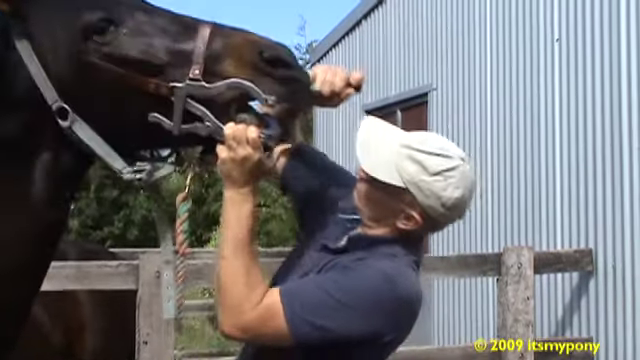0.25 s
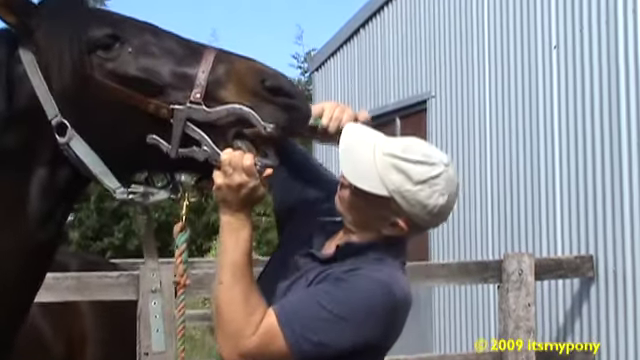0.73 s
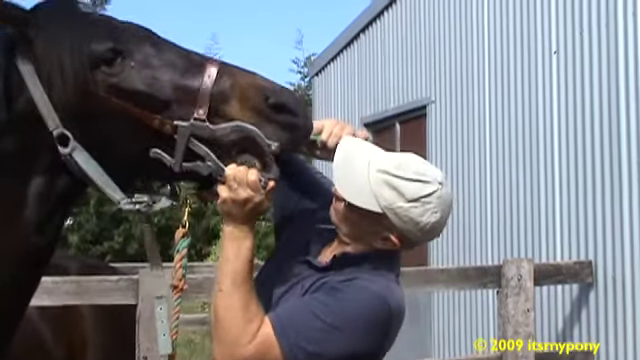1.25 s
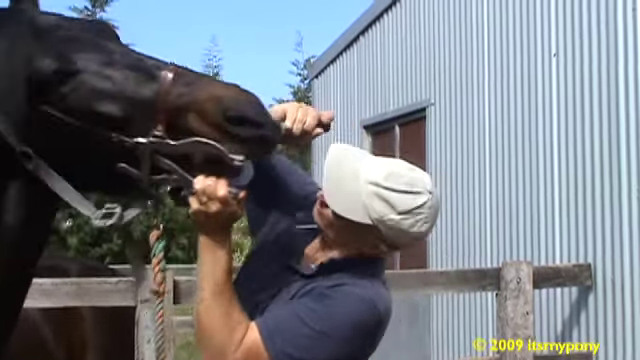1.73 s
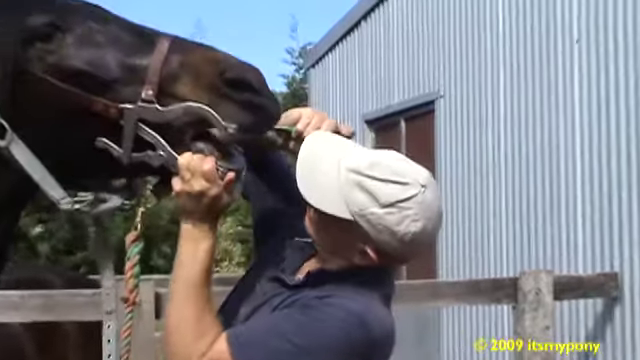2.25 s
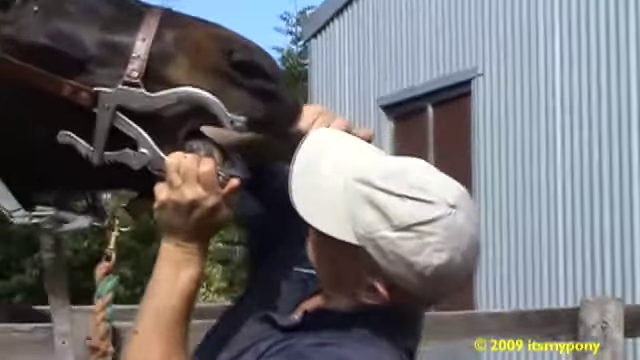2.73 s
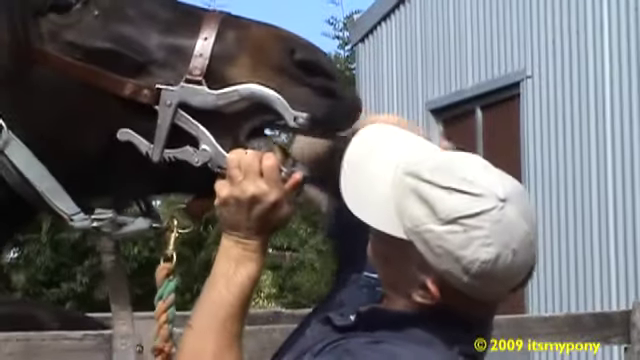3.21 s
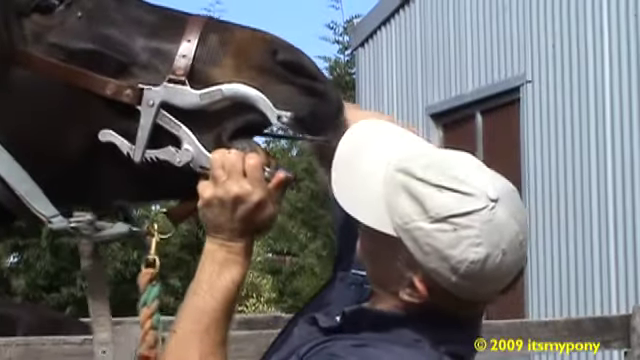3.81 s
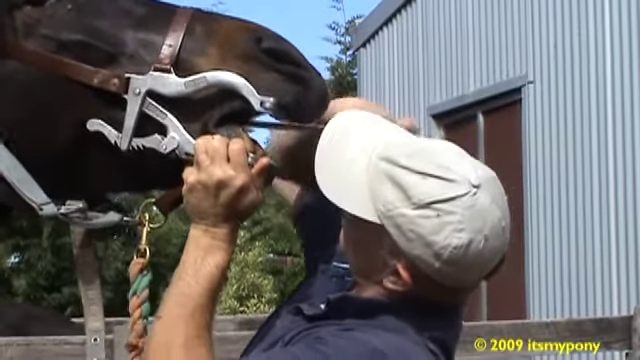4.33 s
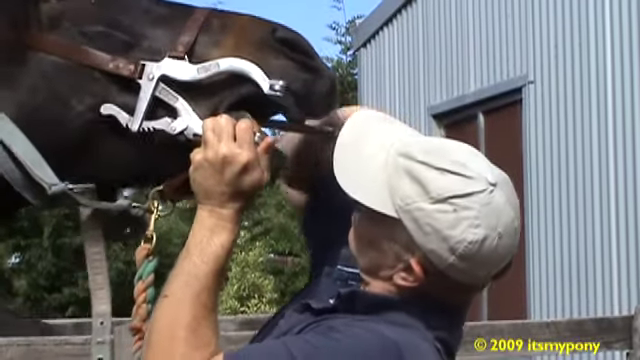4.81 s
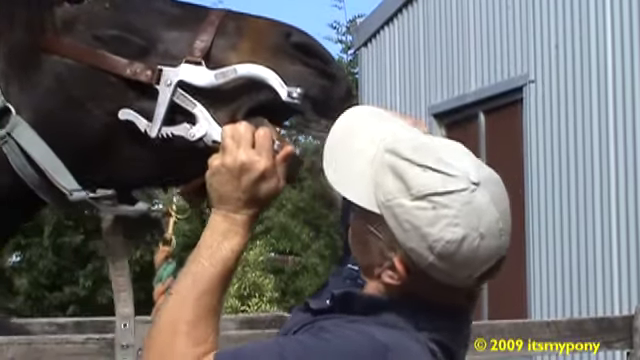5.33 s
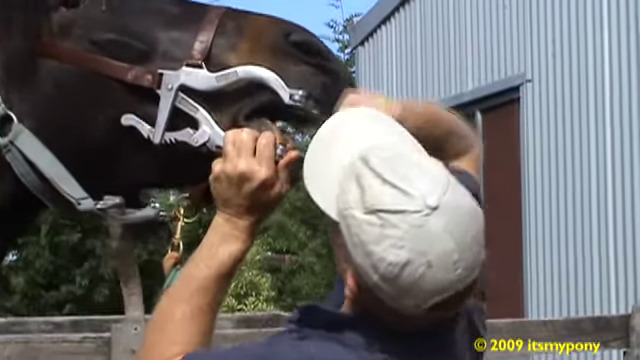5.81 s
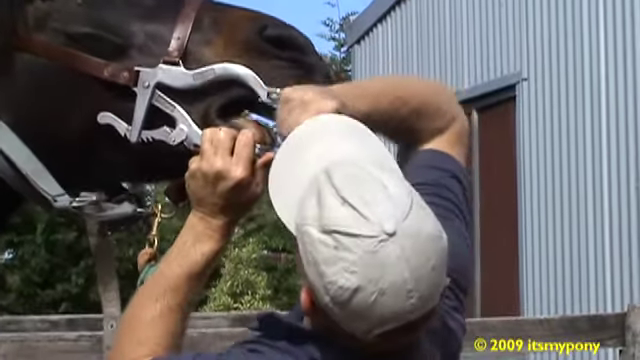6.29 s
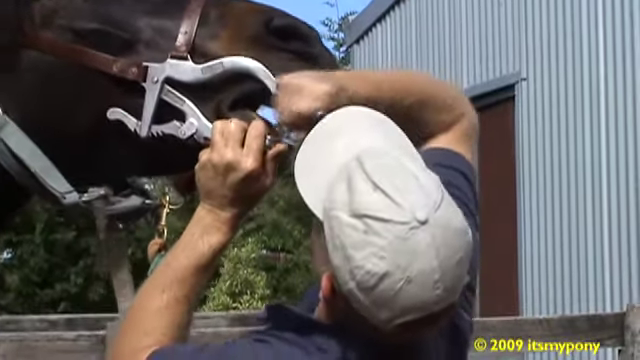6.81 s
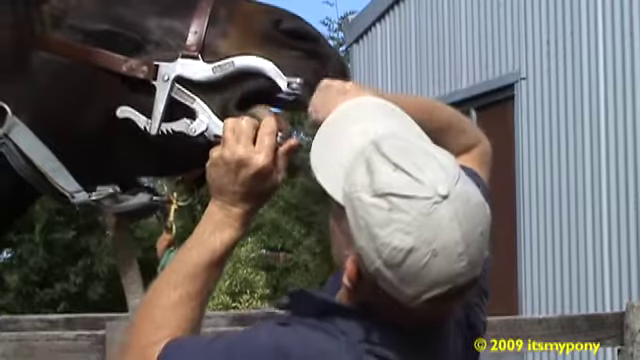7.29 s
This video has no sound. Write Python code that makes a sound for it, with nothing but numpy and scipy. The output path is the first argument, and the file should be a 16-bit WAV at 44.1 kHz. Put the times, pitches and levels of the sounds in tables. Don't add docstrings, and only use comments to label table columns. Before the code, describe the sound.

Gritty metal filing on large animal teeth, faint at first then hard and fast, with hollow shaft hum, sharp clacks, dull ticks and distant chirps outdoors.

```python
import sys
import numpy as np
from scipy import signal
from scipy.io import wavfile
from scipy.ndimage import uniform_filter1d

SR = 44100
rng = np.random.default_rng(int(sys.argv[2]) if len(sys.argv) > 2 else 0)


def convert_level_to_amplitude(level_db):
    exponent = np.asarray(level_db, float) / 20
    return 10 ** exponent


def inscribe(sig):
    pcm = np.round(np.clip(np.atleast_2d(sig).T, -1, 1) * 32767)
    wavfile.write(sys.argv[1], SR, pcm.astype(np.int16))


N = 332955
T = np.arange(N) / SR

# [Hz, dB]
WASH = [(26, -40.5), (45, 3.5), (92, 4), (287, -3.5), (392, 3.5), (479, -6), (1250, -7.5), (8500, -20.5)]
WASH_DB = -51.5
# [s, Hz, dB]
ENGINES = [
    [(0.0, 92.2, -57), (1.282, 78.4, -56.5), (1.5, 83.9, -72)],
    [(1.75, 67, -53), (2.312, 111, -54.5), (2.55, 106.7, -66)],
    [(3.25, 106, -53), (4.37, 113.2, -47), (5.9, 131.4, -54)],
    [(7.12, 138, -76), (7.234, 139.4, -44.5), (7.55, 134, -44.5)],
]
# [s, Hz, dB]
SONG = [
    (0, 5600, -16),
    (.011, 3800, -6),
    (.024, 3300, -4),
    (.029, 4900, -28),
    (.037, 3080, -7),
    (.058, 3250, -1),
    (.066, 3700, -22),
    (.077, 3000, -5),
    (.088, 3600, -18),
]
# [s, dB]
SONGS = [
    (0.170, -45),
    (0.852, -47),
    (1.844, -42.5),
    (2.456, -40.5),
    (5.693, -35),
    (6.324, -38),
    (7.003, -36),
]
# [s, Hz, dB]
PEEP = [
    (0, 3800, -60),
    (.035, 4700, -65),
]
PEEPS = [
    .7,
    .81,
]
# [s, Hz, dB]
TRILL = [
    (2.01, 4800, -64),
    (2.14, 4780, -66),
]

# [Hz, Hz, dB]
JAW = [
    (572, 68, 5.5),
    (752.4, 10, -6.5),
    (940, 35, -1.5),
    (1283, 9, -9.5),
    (960, 1120, 6.5),
]
BLADE = [
    (2030, 210, -5.5),
    (2430, 680, 11),
    (2860, 60, 1),
    (3260, 150, -1),
    (3556, 120, 3.5),
    (4160, 180, -2),
    (2720, 820, 2),
]
SIZZLE = [
    (4830, 960, -5.5),
    (5750, 910, 9.5),
    (6670, 800, 0.5),
    (7320, 300, 3.5),
    (8500, 900, -14.5),
    (6000, 1400, 2),
]
VALLEYS_HZ = [1730, 2580, 4615, 6130]

# [s, dB, Hz]
THUMPS = [(0.819, -44, 289), (2.079, -32, 190), (2.693, -35, 161), (3.158, -34, 235.5), (5.775, -29, 258),
          (6.002, -30.5, 112), (6.243, -30, 178.1), (6.429, -35, 180.1), (6.607, -30, 184.8),
          (6.965, -30.5, 183), (7.145, -34, 200.2), (7.321, -37, 187.2)]
# [s, dB, Hz]
SNAGS = [(0.079, -23, 953), (0.388, -24.5, 780), (0.413, -29.5, 950), (0.494, -32, 993),
         (0.591, -32.5, 929), (0.877, -34, 2030), (1.003, -29, 930), (1.451, -28, 2330), (1.533, -26, 770),
         (1.609, -22, 748), (1.635, -18.5, 931), (1.801, -18, 709.4), (1.933, -22, 1110), (2.299, -20, 940),
         (2.386, -30, 965), (2.49, -24, 904), (2.891, -11.5, 775), (3.068, -15.5, 1090),
         (3.162, -19, 743.4), (3.225, -17, 755.7), (3.308, -17, 780), (3.355, -26, 937), (3.511, -16, 978),
         (3.579, -17.5, 3640), (3.683, -22, 1310), (3.704, -13.5, 1140), (4.119, -18, 1290),
         (4.363, -24, 764), (4.533, -21.5, 3500), (4.58, -13.5, 956), (4.844, -15, 2849),
         (4.859, -15.5, 2842), (4.976, -13, 950.6), (5.052, -17, 980), (5.173, -11, 980),
         (5.195, -22, 933.5), (5.473, -17.5, 942), (3.672, -27, 1400), (5.977, -18, 1110),
         (6.216, -20, 740), (6.534, -17.5, 950), (6.587, -18.5, 751), (7.501, -24, 900),
         (6.774, -16.5, 776), (6.964, -25.5, 703)]
# [s, dB, ms, Hz]
CHATTERS = [(1.46, -38, 21.35, 2230), (3.588, -37, 19, 2900), (1.82, -36, 15, 2400), (2.32, -54, 24, 4520),
            (2.612, -32, 29.5, 2380), (2.615, -44, 34.5, 6510), (2.797, -37, 45, 2360),
            (3.216, -31.5, 35.4, 2325), (5.937, -29, 11, 2430), (2.523, -40, 6.4, 4400),
            (3.377, -44.5, 20, 4280), (3.41, -34, 15, 3600), (3.605, -39, 32, 7760),
            (3.606, -33.5, 62, 3680), (3.618, -40, 30, 4280), (2.54, -39, 8, 4400),
            (4.004, -33.5, 14.3, 5455), (4.048, -32.5, 33, 5560), (4.059, -31, 14, 7220),
            (4.128, -36, 38, 3627), (4.248, -36, 20, 4970), (4.251, -37, 31, 7320), (4.459, -32, 32, 2890),
            (4.684, -26.5, 29.7, 5795), (4.676, -34, 7, 5570), (4.865, -31, 24.7, 2870),
            (5.006, -32, 9, 2900), (5.087, -44, 29.4, 7140), (5.299, -44, 30, 7340), (5.364, -34, 25, 2860),
            (5.37, -36, 15.7, 3560), (7.336, -32, 28, 3440), (5.491, -36.5, 39, 3530),
            (5.501, -39.5, 28.7, 7320), (5.506, -42, 20, 8280), (5.58, -44, 22, 7300),
            (3.815, -36.5, 50, 3660), (5.683, -37, 30, 8151), (5.695, -31.5, 22, 3596),
            (6.612, -51, 11.8, 7280), (6.791, -36, 16, 2870), (6.791, -33.5, 19.5, 3640),
            (1.467, -47, 24, 2300),
    (6.67, -41, 13, 1364),
    (1.552, -40.5, 21, 1600),
    (6, -32.5, 20, 3000),
    (7.237, -27, 10.6, 1490),
]
# [s, dB, ms, Hz]
DRONES = [(0.094, -42, 22, 956), (0.363, -51, 18, 930), (0.414, -47, 26, 943), (7.16, -42, 11, 740),
          (1.368, -53, 63, 1270), (1.692, -54, 70, 1260), (2.405, -41, 27, 937.4), (2.621, -40, 15, 1250),
          (2.804, -38.5, 28, 1240), (3.0, -41, 22, 984), (3.2, -35.5, 32.1, 1480), (3.833, -47, 34, 1569),
          (4.041, -40, 57, 960), (4.145, -28.5, 57, 1341), (4.239, -34.5, 39, 950), (4.581, -29, 28, 942),
          (4.65, -34.5, 24, 1360), (4.686, -40, 30.2, 1340), (4.879, -32, 60, 972), (4.976, -29, 39.6, 964),
          (5.064, -33, 48, 1375), (5.065, -37, 34, 960), (5.19, -30, 34, 957), (5.281, -32, 17, 1340),
          (5.29, -34, 55, 950), (5.59, -31.5, 57, 1003), (5.681, -38, 52, 993), (6.186, -41.5, 20, 1370),
          (6.241, -37, 30, 1530), (6.541, -33, 17.3, 610), (6.626, -37, 35.4, 1425),
          (6.818, -45.5, 141, 1275), (6.492, -31.5, 26, 1340)]
CHATTER_WIDTH_HZ, DRONE_WIDTH_HZ = 72, 52
SNAG_DB, SNAG_S, SNAG_KICK_DB = -5.5, 0.022, -6.5

# [s, dB, dB, Hz]
KNOCKS = [(0.2576, -25.5, -32, 4520), (0.9613, -32.5, -4.5, 5960), (1.27, -43.5, -14, 2250),
          (2.2495, -23.5, -12.5, 2780), (2.4397, -22.5, -15, 4220), (2.8603, -23.5, -7.5, 2890),
          (2.9406, -21, -12.5, 2818), (3.045, -19.5, -26, 2560), (3.13, -21.5, -35, 8150),
          (3.1423, -24, -17, 2710), (3.5101, -29.5, 1, 3570), (3.9824, -20, -25, 3000),
          (4.273, -17, -39, 3410), (4.3425, -17.5, -7.5, 3400), (4.4216, -16.5, -27, 2928),
          (4.4969, -13, -24, 3544), (4.7702, -13.5, -16, 2875), (5.771, -19, -1.5, 2417),
          (5.9313, -14, -7.5, 7020), (6.0988, -17.5, -5, 4134), (6.325, -20.5, -1, 6070),
          (6.478, -25.5, -5.5, 2820), (6.608, -28.5, -7, 2860), (6.7097, -16.5, -9.5, 2780),
          (6.8814, -13, -10, 3364), (7.1441, -23.5, -12.5, 3446), (7.2311, -21.5, -7.5, 2550),
          (7.324, -19, -8.5, 3300), (7.444, -16.5, -8.5, 2580), (7.5276, -17, -29, 3466)]
# [s, dB]
TOUCHES = [
    (4.686, -17),
    (5.0573, -28.5),
]
TOUCH_GAG_DB, TOUCH_HZ = -15, 2900
GAG_HZ = 1321
KICK_DB, KICK_HZ = -2, 372
KNOCK_SIZZLE_DB, HARD_DB, DULLING = -6.5, -12, 1
FLAT_HZ, FLAT_DB = 3480, -6

# [s, dB, ms, Hz]
STRUCK = [(0.09, -33.5, 22, 379.0), (0.413, -37, 49, 387.0), (0.597, -40, 20, 386.0),
          (0.97, -30.5, 21, 385), (1.05, -46, 25, 385), (1.613, -40, 20, 380), (2.228, -34.5, 21, 380),
          (1.46, -26.5, 34, 370.0), (1.815, -28.5, 25, 387.0), (2.134, -36, 18, 380.0),
          (2.314, -31.5, 48, 393.0), (3.233, -23.5, 11.4, 385.0), (3.377, -25, 32, 391.0),
          (3.787, -29, 76, 377.0), (4.012, -26, 36, 394.0), (4.22, -23.5, 39, 388.0),
          (4.507, -26.5, 15.4, 388.0), (4.891, -27, 14.4, 370.0), (5.061, -17.5, 29, 371.0),
          (5.666, -29, 41.6, 361.0), (5.784, -24, 42, 366.0), (5.962, -25.5, 66, 378.0),
          (6.105, -34, 25.9, 376.0), (6.344, -28.5, 58, 383.0), (6.487, -28, 33.1, 360.0),
          (6.895, -29.5, 65, 343.0), (6.974, -29.5, 26, 364.0), (7.15, -33, 24.8, 353.0),
          (7.241, -32, 27.3, 360.0), (7.459, -31.5, 120, 366.0)]
# [s, dB, ms, Hz]
SWUNG = [(1.014, -34, 34, 375), (1.551, -24, 38, 378.6), (1.639, -22.5, 30, 384.4), (2.745, -24, 62, 380.3),
         (3.33, -22, 35, 359.2), (3.627, -22, 40, 362.3), (3.729, -20.5, 55, 380.8),
         (4.344, -23, 9.95, 392.6), (4.41, -22.5, 65, 381.2), (4.788, -22.5, 65, 370),
         (5.088, -24.5, 16, 372), (5.186, -24, 27, 372), (5.406, -20, 64, 359.7), (6.253, -22.5, 35, 361.3),
         (6.555, -30.5, 37, 353.2), (6.627, -18.5, 26, 355), (6.71, -27.5, 30, 387.7),
         (6.792, -29.5, 58, 360.8), (7.343, -28.5, 46, 397.7), (7.566, -11, 50.4, 351)]
# [s, dB, ms, Hz]
GRIPPED = [(0.375, -39.5, 32, 378), (0.514, -34, 22, 396), (0.557, -43, 21, 400), (0.665, -45, 23, 390),
           (1.958, -26.5, 41, 372.0), (2.271, -34, 15, 371.4), (2.409, -26.5, 31, 389.6),
           (2.563, -23.5, 17, 382.6), (2.614, -29.5, 100, 381.0), (2.905, -19, 24, 385.4),
           (2.984, -25.5, 26, 399.4), (3.079, -34, 47, 359), (3.2, -20.5, 27, 381), (3.543, -22, 52, 365.2),
           (3.959, -21.5, 55, 376.5), (4.178, -21.5, 61, 375.7), (4.596, -23.5, 30.3, 379.7),
           (4.689, -27, 57, 372.7), (5.004, -19.5, 40, 360.2), (5.212, -15.5, 36, 372.0),
           (5.272, -27, 26.5, 402.4), (5.518, -24.5, 50.3, 353.7), (5.58, -21.5, 27, 399),
           (6.197, -28.5, 23, 353), (7.1, -33, 50, 376.8)]
# [s,
# dB, ms, Hz]
SWUNG_MORE = [
    (0.269, -46, 28, 395),
    (1.341, -49, 46, 345.2),
    (1.735, -46, 37, 367),
    (5.625, -27, 36, 365.4),
    (6.451, -28, 42.2, 385.5),
]
HUM_RISE = [0.17, 0.51, 0.7]
RING_ON_S, RING_ON_DB = 0.028, -14.5

# [s, dB, ms]
JABS = [(0.084, -45, 35), (0.235, -52, 27), (0.982, -62, 53.5), (1.458, -35, 34), (1.615, -37, 44),
        (1.808, -36, 32), (4.131, -31, 68), (4.366, -35.5, 41), (4.45, -31.5, 51), (5.359, -37.5, 87),
        (5.776, -41, 72), (5.978, -39.5, 57), (6.224, -39, 45.5), (6.485, -41, 30.5), (6.777, -36.5, 37.0),
        (7.251, -47, 44), (7.324, -37, 41)]
# [s, dB, ms]
SWEEPS = [(0.311, -47, 15), (0.396, -54.5, 44), (1.225, -51, 37), (1.547, -44.5, 45), (1.929, -46.5, 63),
          (2.097, -55, 50), (2.408, -37, 65), (3.071, -31, 45), (3.314, -40, 32), (3.391, -33, 55),
          (3.71, -35, 71.6), (3.813, -32, 64), (4.578, -27.5, 37), (4.776, -29, 46), (4.863, -26, 56),
          (5.489, -32.5, 61), (5.59, -34.5, 59.5), (5.683, -32.5, 39.3), (6.347, -37.5, 40),
          (6.425, -37, 50), (6.542, -42.5, 21), (6.608, -39, 80), (6.723, -32, 26.3), (6.899, -34.5, 24),
          (6.968, -35.5, 47), (7.074, -49.5, 84), (7.147, -40.5, 34), (7.464, -43.5, 48)]
# [s, dB, ms]
DRAGS = [(0.506, -51.5, 25), (2.307, -48, 97), (2.526, -36.5, 50), (2.613, -34.5, 71), (2.724, -39.5, 47),
         (2.808, -32, 41), (2.899, -33.5, 40), (3.0, -29.5, 46), (3.212, -31.5, 103), (3.524, -43, 65),
         (3.616, -32, 54), (3.936, -33.5, 50), (4.042, -30, 71), (4.259, -27.5, 63.5), (4.683, -26.5, 57),
         (4.996, -37.5, 69.6), (5.078, -29.5, 59.4), (5.206, -38.5, 106), (5.296, -29, 51),
         (5.947, -32, 9.25), (6.186, -43, 48.0), (7.569, -21, 38.6)]
STROKE_RISE = [0.22, 0.45, 0.65]
# [s, dB]
EDGE = [
    (0, -4),
    (.45, -12),
    (1.9, -11),
    (2.4, -12),
    (3.4, -5),
    (4.5, -12.5),
    (5.7, -4),
    (6.4, -10),
    (7.3, -3),
]
JAW_BY_GRIT_DB, JAW_BY_HUM_DB = 0.3, -9.5
JAW_MASS = 900
FIRM_DB, JAW_LAW, SIZZLE_LAW = -33.5, 0.69, 1.11


def evened(x):
    return x / np.sqrt(np.mean(x ** 2) + 1e-20)


def steadied(x):
    power = uniform_filter1d(uniform_filter1d(x ** 2, size=1500), size=1500)
    return x / np.sqrt(power + 1e-12)


def add(mix, s, sound):
    part = mix[round(s * SR):][:len(sound)]
    part += sound[:len(part)]


def drift(hz):
    knots = rng.standard_normal(3000)
    return 1.22 * np.interp(T * hz, np.arange(len(knots)), knots)


def ring(x, hz, width):
    r = np.exp(-np.pi * width / SR)
    return 2 * signal.lfilter([1 - r], [1, -r * np.exp(2j * np.pi * hz / SR)], x).real


def band(x, lo_hz, hi_hz):
    return signal.sosfilt(signal.butter(2, [lo_hz, hi_hz], "bandpass", fs=SR, output="sos"), x)


def whistle(rows, waver):
    s, hz, db = np.transpose(rows)
    t = np.arange(s[0], s[-1], 1 / SR)
    phase = 2 * np.pi * np.cumsum(np.interp(t, s, hz)) / SR
    tone = np.sin(phase) * signal.windows.tukey(len(t), .1)
    return s[0], np.sqrt(2) * convert_level_to_amplitude(np.interp(t, s, db) + waver[:len(t)]) * tone


def wash():
    frames, hz = N // 256 + 5, np.fft.rfftfreq(1024, 1 / SR)
    a, b, patches = rng.standard_normal((frames, 513, 3)).T
    patches = evened(uniform_filter1d(uniform_filter1d(patches, size=10, axis=0), size=14, axis=1))
    f, db = np.transpose(WASH)
    tilt_db = np.interp(np.log(hz + 1), np.log(f + 1), db)[:, None]
    z = (a + 1j * b) * convert_level_to_amplitude(tilt_db + 2.2 * patches)
    noise = signal.istft(z, nperseg=1024, noverlap=768)[1][:N]
    nearer_db = 3.8 * T / T[-1]
    return convert_level_to_amplitude(WASH_DB + nearer_db) * evened(noise)


def traffic():
    out = np.zeros(N)
    for rows in ENGINES:
        add(out, *whistle(rows, 1.5 * drift(12)))
    return out


def bird():
    out, phrase = np.zeros(N), whistle(SONG, 3.5 * drift(400))[1]
    for s, db in SONGS:
        add(out, s, convert_level_to_amplitude(db) * phrase)
    add(out, *whistle(TRILL, 4 * drift(150)))
    for s in PEEPS:
        add(out, s, whistle(PEEP, drift(250))[1])
    return out


def yard(x):
    t = T[:9000]
    hits = rng.choice([-1., 1.], len(t)) * (rng.random(len(t)) < 2000 / SR)
    taps = hits * (t > .006) * convert_level_to_amplitude(-60 * t / 0.21)
    return signal.oaconvolve(x, taps / np.linalg.norm(taps))[:N]


def thumps():
    out, t = np.zeros(N), T[:5000]
    for s, db, hz in THUMPS:
        cycles = np.sin(2 * np.pi * hz * t) + 0.55 * np.sin(3 * np.pi * hz * t)
        add(out, s, convert_level_to_amplitude(db + 3.5 - 60 * t / 0.11) * (1 - np.exp(-t / 0.0078)) * cycles)
    return out


def snags():
    out, t = np.zeros(N), T[:2500]
    jolt = convert_level_to_amplitude(SNAG_KICK_DB - 60 * t / 0.17) * np.sin(2 * np.pi * KICK_HZ * t)
    for (s, db, hz), crack in zip(SNAGS, rng.standard_normal((len(SNAGS), len(t)))):
        crack = crack * convert_level_to_amplitude(-60 * t / SNAG_S) * (1 - np.exp(-t / 0.0002))
        tick = band(band(crack, 520, 2500), 520, 2500) + 4.7 * ring(ring(crack, hz, 130), hz, 900)
        add(out, s, convert_level_to_amplitude(db + SNAG_DB) * (tick / abs(tick).max() + jolt))
    return out


def chatter(rows, width_hz):
    out, u = np.zeros(N), np.arange(-3000, 3000) / SR
    for (s, db, length, hz), grit in zip(rows, rng.standard_normal((len(rows), len(u)))):
        rung = ring(ring(grit * abs(grit), hz, width_hz), hz, 4 * width_hz)
        add(out, s + u[0], evened(rung) * convert_level_to_amplitude(db - 6.4 * (2300.0 * u / length) ** 2))
    return out


def knocks():
    out, t = np.zeros(N), T[:5000]
    blows = KNOCKS + [(s, db, TOUCH_GAG_DB, TOUCH_HZ) for s, db in TOUCHES]
    modes = (BLADE + SIZZLE)[:12]
    luck = rng.standard_normal((len(blows), 12 + len(t)))
    for (s, db, gag_db, hz), shares, crack in zip(blows, luck[:, :12], luck[:, 12:]):
        crack = crack * (convert_level_to_amplitude(-60 * t / 0.016) + 0.23 * convert_level_to_amplitude(-60 * t / 0.088)) * (1 - np.exp(-t / .0003))
        rung = [convert_level_to_amplitude(mode_db + 2.5 * share) * ring(crack, f, width) * np.sqrt(100 / width)
                for (f, width, mode_db), share in zip(modes, shares)]
        sizzle_db = KNOCK_SIZZLE_DB - DULLING * max(db - HARD_DB, 0)
        sizzle_db += FLAT_DB * (abs(hz / FLAT_HZ - 1) < .06)
        gag = ring(ring(crack, GAG_HZ, 49), GAG_HZ, 230) + 0.15 * band(crack, 640, 1200)
        kick = ring(ring(crack, KICK_HZ, 53), KICK_HZ, 270)
        blade = band(sum(rung[:len(BLADE)]), 1400, 4500)
        sizzle = band(sum(rung[len(BLADE):]), 4400, 9000)
        favoured = ring(ring(crack, hz, 150), hz, 900)
        parts = [(gag, gag_db), (kick, gag_db + KICK_DB), (blade, -6.1),
                 (sizzle, sizzle_db), (favoured, -10)]
        for part, part_db in parts:
            peak = np.sqrt(uniform_filter1d(part ** 2, size=130).max())
            add(out, s, convert_level_to_amplitude(db + part_db) * part / peak)
    return out


def swells(tables, rise_shares):
    power = np.zeros(N)
    u = np.arange(-SR // 4, SR // 4) / SR
    for rows, share in zip(tables, rise_shares):
        for s, db, length, *_ in rows:
            side = np.where(u < 0, share, 1 - share)
            part = convert_level_to_amplitude(db - 6 * (1e3 * abs(u) / length / side) ** 1.95) ** 2
            add(power, max(s - .25, 0), part[max(round((.25 - s) * SR), 0):])
    return np.sqrt(power)


def shaft():
    s, _, _, hz = np.transpose(sorted(STRUCK + SWUNG + SWUNG_MORE + GRIPPED))
    turns = np.cumsum(np.interp(T, s, hz) * (1 + 0.0348 * drift(133))) / SR
    tone = np.sqrt(2) * np.cos(2 * np.pi * turns) + 0.11 * np.cos(4 * np.pi * turns)
    bend = swells([STRUCK, SWUNG + SWUNG_MORE, GRIPPED], HUM_RISE)
    keep = np.exp(-1 / (RING_ON_S * SR))
    bend = np.hypot(bend, convert_level_to_amplitude(RING_ON_DB) * signal.lfilter([1 - keep], [1, -keep], bend))
    return bend * tone * convert_level_to_amplitude(3 * drift(90)), turns, bend


def catches(turns, per_s):
    size = convert_level_to_amplitude(3.1 * np.minimum(rng.exponential(1, N), 4))
    hits = (rng.random(N) < per_s / SR) * rng.choice([-1., 1.], N)
    return evened(hits * size * (1 + 0.49 * np.cos(2 * np.pi * turns)))


def body(drive, modes, wander_db):
    out = np.zeros(N)
    for hz, width, db in modes:
        turn = np.exp(2j * np.pi * np.cumsum(hz * (1 + 0.03 * drift(11))) / SR)
        r = np.exp(-np.pi * width / SR)
        shifted = drive * convert_level_to_amplitude(db + wander_db * drift(18)) * turn.conj()
        rung = signal.lfilter([1 - r], [1, -r], shifted)
        out += (turn * rung).real * np.sqrt(100 / width)
    return out


def hollowed(x):
    for hz in VALLEYS_HZ:
        x = x - .5 * ring(x, hz, 130)
    return x


def grind(turns, bend):
    coarse, clumps = catches(turns, 2000), convert_level_to_amplitude(2.7 * drift(90))
    fine = 0.52 * coarse + 0.92 * catches(turns, 3500)
    finest = 0.52 * coarse + 0.92 * catches(turns, 3500)
    cut = swells([JABS, SWEEPS, DRAGS], STROKE_RISE)
    firm = cut / convert_level_to_amplitude(FIRM_DB)
    by_grit = convert_level_to_amplitude(JAW_BY_GRIT_DB + FIRM_DB) * firm ** JAW_LAW
    by_hum = convert_level_to_amplitude(JAW_BY_HUM_DB) * uniform_filter1d(bend, size=JAW_MASS)
    shake = np.hypot(by_grit, by_hum)
    jaw = steadied(band(body(coarse * clumps, JAW, 2.3), 330, 1560)) * shake
    blade = steadied(band(body(fine * clumps, BLADE, 5.5), 1500, 4600)) * cut * convert_level_to_amplitude(-1)
    sizzle = steadied(band(body(finest * clumps[::-1], SIZZLE, 5), 4400, 9000))
    sizzle_level = firm ** SIZZLE_LAW * convert_level_to_amplitude(FIRM_DB + np.interp(T, *np.transpose(EDGE)))
    rub = steadied(band(coarse, 181, 330)) * shake * convert_level_to_amplitude(-16.0)
    return jaw + blade + sizzle * sizzle_level + rub


def scene():
    far, song = wash() + traffic(), bird()
    hum, turns, bend = shaft()
    near = hollowed(grind(turns, bend) + knocks()) + thumps() + snags()
    near = near + chatter(CHATTERS, CHATTER_WIDTH_HZ) + chatter(DRONES, DRONE_WIDTH_HZ)
    hum = band(hum, 322, 900)
    return (hum + near + song + yard(convert_level_to_amplitude(-14) * near + .45 * song) + far)[None]


def gated(x):
    size = 2048
    window = np.sqrt(signal.windows.hann(size, False))
    z = signal.stft(x, nperseg=size, window=window)[2]
    power = uniform_filter1d(abs(z[:-1]) ** 2, size=2, axis=1).reshape(size // 16, 8, -1).mean(1)
    db = 10 * np.log10(power + 1e-20)
    total = power.sum(0)
    busy = (np.arange(len(db)) > 21)[:, None] * (total > np.median(total))
    weak = db < uniform_filter1d(db, size=11, axis=0) - 7 + 5.4 * busy
    weak[:9] = False
    weak[:, 1:] &= np.diff(db[8:50].mean(0)) < 5
    z[:-1] *= 1 - .97 * np.repeat(weak, 8, axis=0)
    return signal.istft(z, nperseg=size, window=window)[1][:N]


def low_pass(x):
    return signal.sosfilt(signal.butter(12, 9550, fs=SR, output="sos"), x)


def record(dry):
    cut = signal.sosfilt(signal.butter(3, 58, "highpass", fs=SR, output="sos"), gated(dry[0]))
    narrow = signal.oaconvolve(cut, signal.firwin(401, 9250, window=("kaiser", 9), fs=SR), "same")
    return low_pass(narrow[None])


dry = scene()
out = record(dry)
inscribe(out)
```